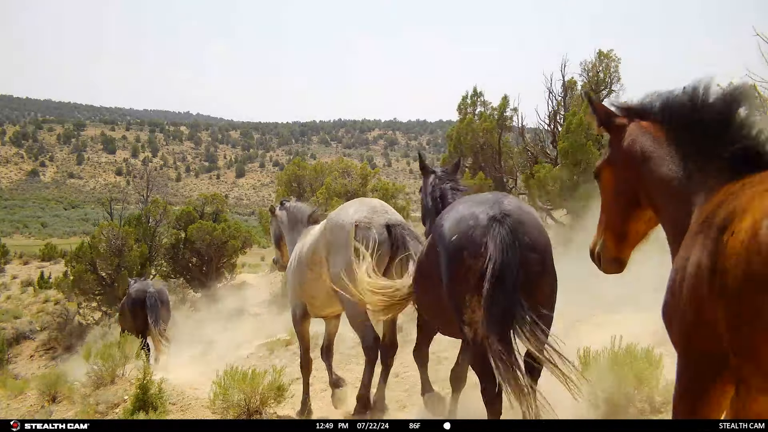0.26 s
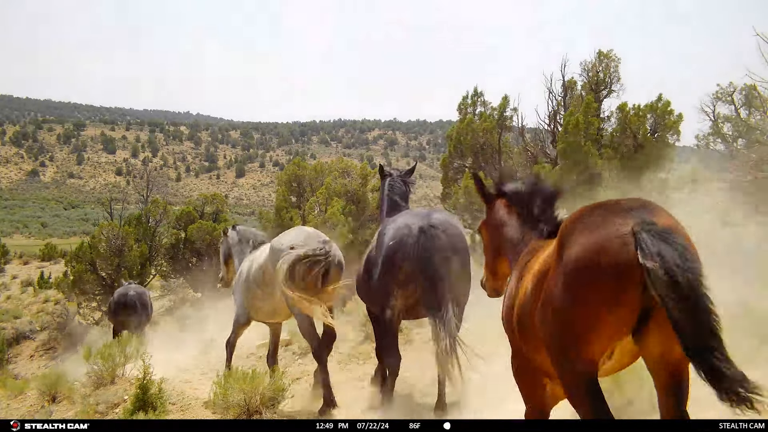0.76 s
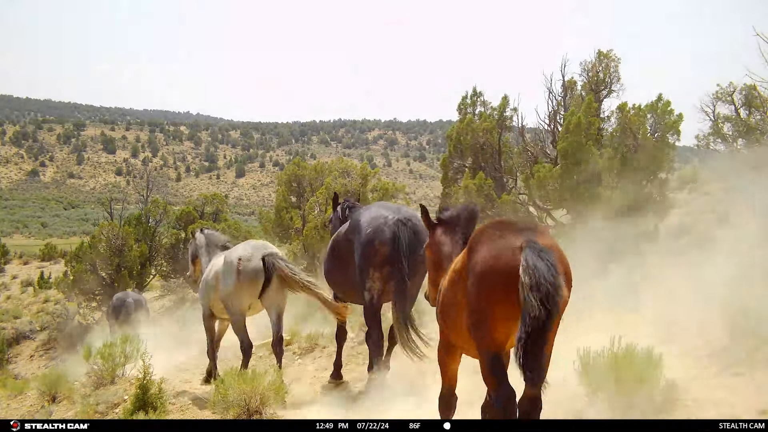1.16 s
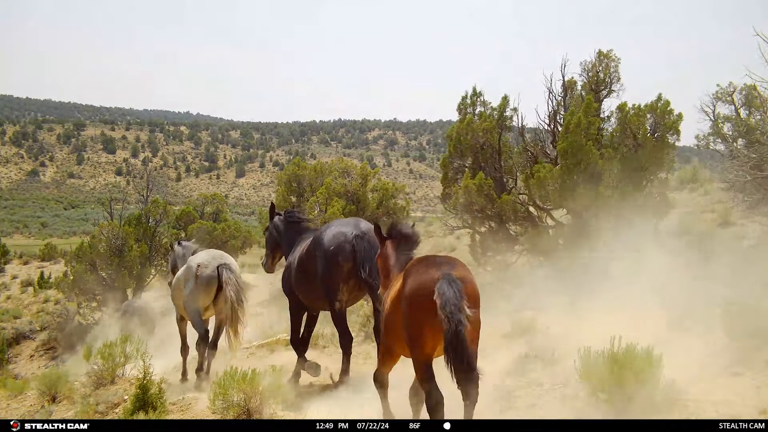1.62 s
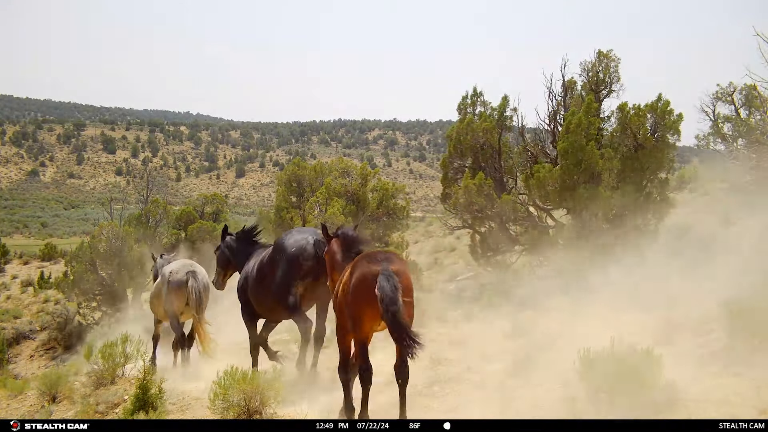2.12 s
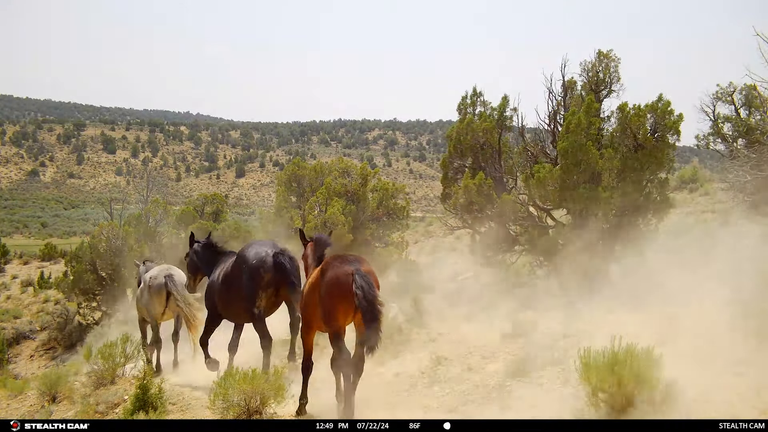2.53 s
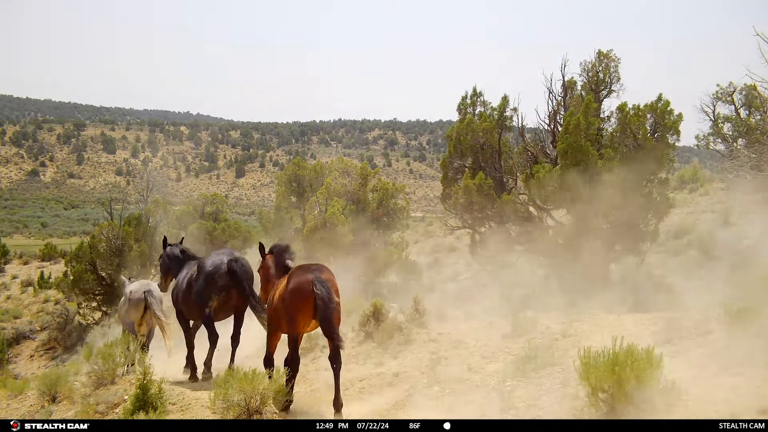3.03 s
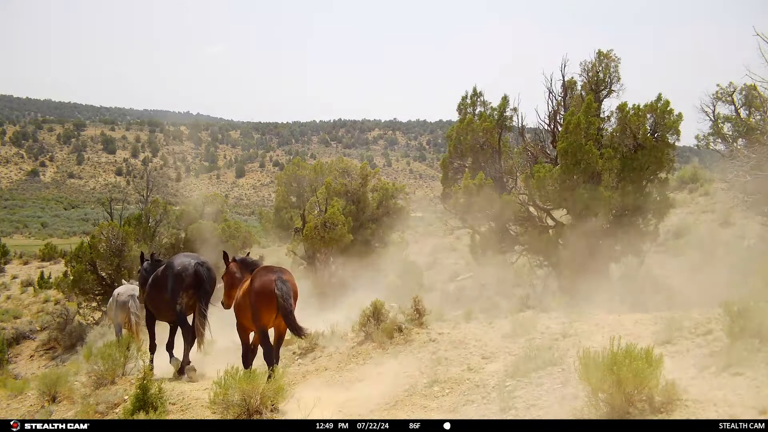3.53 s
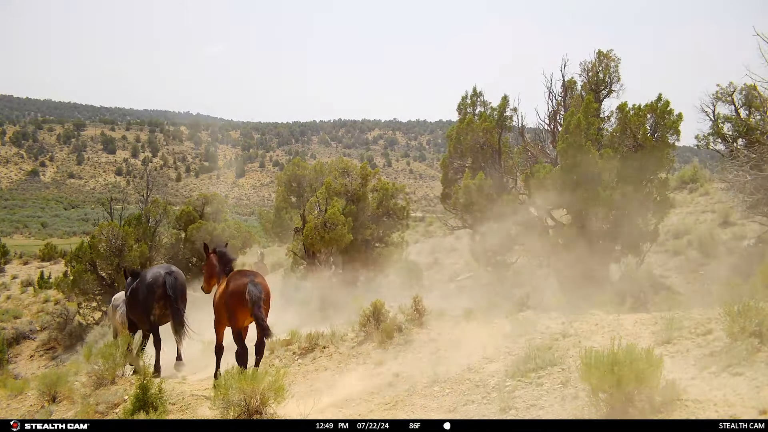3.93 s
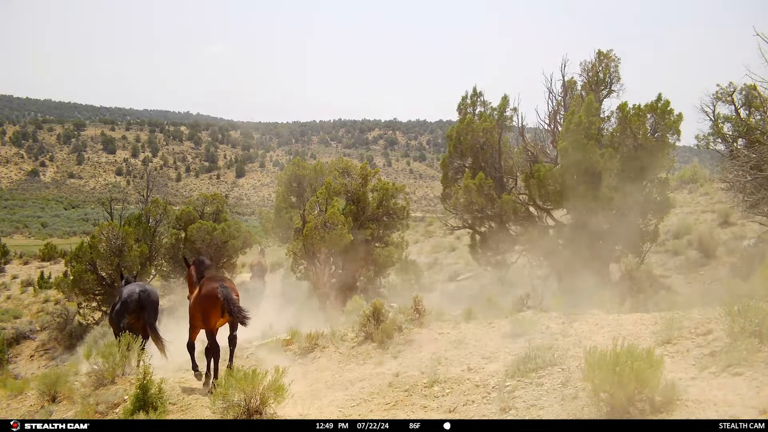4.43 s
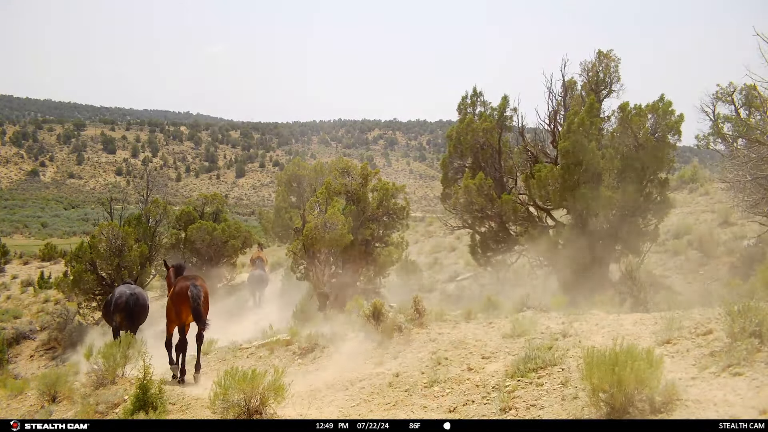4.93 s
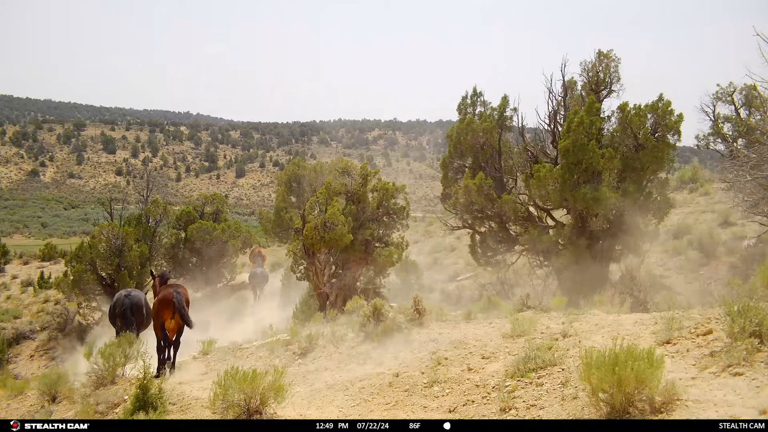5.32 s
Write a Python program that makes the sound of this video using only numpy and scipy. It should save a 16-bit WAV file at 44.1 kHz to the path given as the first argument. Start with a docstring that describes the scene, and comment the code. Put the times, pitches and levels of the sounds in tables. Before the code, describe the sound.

Several horses trot away over dry, stony dirt, heard outdoors through a small microphone. For the first 1.2 seconds, close, dull hoof thuds land unevenly, with bright stone clicks, gritty scuffs and low wind gusts buffeting the microphone. There is a brief lull around 1.5 seconds. From about 1.8 to 4 seconds the hoofbeats continue in an irregular patter with softer clicks and light crunching, including a firm thud at 2.4 seconds and a bright snap at 3.8. The wind rumble swells again from roughly 2.7 to 4.5 seconds, then eases. The sharpest crack, like a twig breaking or a stone being struck, comes at about 4.5 seconds, with another at 4.75. Quick snaps, clicks and sandy scrapes continue until the end at about 5.5 seconds as the thuds grow weaker and sparser. A faint, steady rumble and thin hiss of air run underneath.

```python
"""On dry, stony dirt, horses trot away past a small microphone.
Each hoof impact drives a damped oscillation of the ground; struck stones and dry twigs snap and ring,
and hooves dragging through grit set off a crunch of tiny collisions. Gusts buffet the microphone with
turbulent pressure over a faint background of air, and it overloads on the sharpest crack."""
import sys
import numpy as np
from scipy import signal
from scipy.io import wavfile
from scipy.ndimage import uniform_filter1d

SR = 44100
rng = np.random.default_rng(int(sys.argv[2]) if len(sys.argv) > 2 else 0)


def generate_wav(signal):
    """Clip the signal to [-1, 1] and save it as 16-bit WAV at the path in sys.argv[1]."""
    frames = np.transpose(np.atleast_2d(signal))
    scaled = np.clip(frames, -1, 1) * 32767
    pcm = np.round(scaled).astype(np.int16)
    wavfile.write(sys.argv[1], SR, pcm)


N = 245195

# hooves landing on dirt: t/s, level/dB, f/Hz, T60/s
HOOF_FALLS = [(0.151, -14, 91.5, 0.032), (0.168, -6.5, 88.5, 0.064), (0.241, -19, 122, 0.12),
              (0.469, -27.5, 162, 0.16), (0.573, -7, 149, 0.026), (0.859, -15, 160, 0.072),
              (1.085, -26, 185, 0.11), (1.128, -20, 93, 0.1), (1.187, -25, 274, 0.062),
              (1.839, -29, 145, 0.13), (1.929, -32.5, 196, 0.14), (2.129, -29.5, 173, 0.073),
              (2.278, -19, 136, 0.039), (2.324, -35.5, 194, 0.15), (2.381, -7.5, 168, 0.035),
              (2.647, -22, 202, 0.065), (2.725, -28, 159, 0.071), (2.869, -23.5, 145, 0.075),
              (2.934, -26.5, 130, 0.11), (2.995, -18.5, 123, 0.081), (3.105, -13.5, 200, 0.027),
              (3.145, -21, 154, 0.062), (3.241, -17.5, 107, 0.055), (3.295, -19, 123, 0.11),
              (3.346, -15.5, 129, 0.071), (3.477, -26, 91, 0.055), (3.582, -30, 530, 0.062),
              (3.583, -19.5, 138, 0.083), (3.641, -11, 94, 0.087), (3.907, -19.5, 145, 0.076),
              (4.2, -11, 96.9, 0.018), (4.591, -32, 525, 0.035), (4.593, -16.5, 137, 0.065),
              (4.628, -21.5, 173, 0.079), (4.749, -13, 167, 0.05), (4.845, -29.5, 280, 0.078),
              (5.058, -35, 183, 0.085), (5.124, -31, 208, 0.071), (5.343, -20.5, 294, 0.076)]
def hoof_thuds():
    """Damped oscillation: the ground yields to the hoof in a low swing of sinking pitch and a dull puff."""
    out, t = np.zeros(N), np.arange(8000) / SR
    noises = rng.standard_normal((len(HOOF_FALLS), len(t)))
    for (start, db, hz, t60), noise in zip(HOOF_FALLS, noises):
        swing = np.sin(2 * np.pi * hz * t * (1.1 - 2.0 * t))
        puff = 0.82 * unit_rms(split(noise, hz=3.13 * hz)[0])
        attack = 1 - np.exp(-t * hz / 0.85)
        add(out, start, amp(db - 60 * t / t60) * attack * (swing + puff))
    return out


# stones and twigs struck: t/s, level/dB, f/Hz, relative snap level/dB, relative scatter level/dB
STONE_STRIKES = [(0.038, -25.5, 795, 2, -12), (0.114, -20.5, 2530, -7, -17), (0.147, -20, 5500, 1.5, -7),
                 (0.211, -22.5, 2360, -23, -13), (0.304, -33.5, 3000, -4, -25),
                 (0.558, -23, 1230, -10, -6.5), (0.607, -13, 3860, -9, -20.5),
                 (0.761, -28.5, 2070, -5, -10), (0.823, -20, 1760, -14, -27), (0.868, -20.5, 2330, -8, -25),
                 (0.898, -18, 5540, -5, -23), (0.906, -15, 3670, 0, -22), (0.956, -32.5, 800, -2, -3.5),
                 (1.092, -19, 1490, -3.5, -21), (1.211, -30.5, 724, 13.5, -9), (1.222, -19, 5050, -3, -27),
                 (1.248, -27.5, 790, -11, -12), (1.442, -18, 3350, -8, -17.5), (1.959, -31, 4000, 2, -13),
                 (1.995, -25.5, 900, -3.5, -31), (2.022, -27.5, 710, -12, -26),
                 (2.075, -28.5, 580, -23, -30), (2.153, -32, 3100, -10.5, -11),
                 (2.384, -18, 1210, -5.5, -39), (2.48, -24, 3340, -7, -14), (2.594, -29.5, 5340, -5, -13.5),
                 (2.651, -35, 890, -1, -11.5), (2.728, -34.5, 1500, -4, -18), (2.875, -36.5, 900, -7, -20),
                 (2.9, -32.5, 810, -15, -38), (2.958, -35, 3000, -2, -19.5), (3.066, -33, 900, -13, -27),
                 (3.108, -23, 1190, -25, -29), (3.295, -31, 930, -13, -28), (3.304, -24, 790, -19, -38),
                 (3.344, -26.5, 840, -15, -18), (3.545, -28, 980, -8, -28), (3.564, -26.5, 1080, -14, -22),
                 (3.751, -31, 5800, 4, -16), (3.809, -9.5, 6400, -0.5, -19), (3.86, -31, 1180, -16, -33),
                 (3.9, -37.5, 930, 8.5, -2), (3.998, -30, 4900, 2, -8.5), (4.022, -34, 5000, -7.5, -26),
                 (4.198, -32, 5500, -4, -23.5), (4.236, -24.5, 920, 2, -17), (4.401, -17, 6300, -14, -14.5),
                 (4.478, -8.5, 1600, 11, -12.5), (4.572, -23, 1240, -16, -22), (4.637, -26, 800, 1, -12.5),
                 (4.731, -25, 1060, 6.5, -28), (4.75, -10, 980, 7.5, -12.5), (4.788, -22.5, 3360, 0.5, -16),
                 (4.831, -23.5, 4030, 7, -22), (4.853, -14.5, 4300, 6.5, -12.5),
                 (4.905, -17, 6500, -8.5, -19), (4.944, -20, 6040, 8.5, -20), (4.993, -22.5, 950, 10, -5),
                 (5.021, -20, 5540, 7, -24), (5.03, -29, 3530, 4, -19), (5.06, -27.5, 900, 7, -10),
                 (5.116, -25.5, 6050, 9, -14), (5.174, -27, 3650, 8.5, -11.5), (5.197, -19, 5400, -2, -30),
                 (5.347, -14.5, 700, -9, -20.5), (5.391, -28, 3320, -8, -5.5), (5.446, -33, 1150, 1.5, -3),
                 (5.492, -23, 1130, -28, -2.5)]
def stone_knocks(scatter_t60_s=0.083):
    """Impulse response: a stone or twig snaps and rings for a cycle or two, then chips scatter."""
    out, t = np.zeros(N), np.arange(6000) / SR
    noises = rng.standard_normal((len(STONE_STRIKES), len(t)))
    snap_decay = np.exp(-t / 0.001)
    chips = split(gravel(per_s=1200, spread_db=2.0, cycles=2.5, together=0.25), hz=600)[1]
    for (start, db, hz, snap_db, scatter_db), noise in zip(STONE_STRIKES, noises):
        ring = np.sin(2 * np.pi * hz * t) * np.exp(-t * hz / 1.95)
        burst = split(noise, hz=0.85 * hz)[1] * snap_decay
        snap = amp(snap_db) * burst * np.linalg.norm(snap_decay) / np.linalg.norm(burst)
        loose_chips = np.resize(chips[round(start * SR):], len(t))
        scatter = amp(scatter_db - 60 * t / scatter_t60_s) * loose_chips
        add(out, start, amp(db) * (ring + snap + scatter))
    return out


# spectral shaping of the crunch: f/Hz, gain/dB
GRIT_SPECTRUM = [(88, -34.5), (200, -10.5), (500, -13), (1000, -17), (2500, -24), (6000, -29),
                 (11000, -37.5)]
# hooves dragging: peak t/s, level/dB, 20 dB rise/s, 20 dB fall/s, relative sand level/dB
HOOF_DRAGS = [(0.04, -45, .1, 0.34, 1.5), (0.158, -38.5, .09, 0.185, 5.5), (0.271, -35.5, 0.1, 0.07, 3.5),
              (0.485, -40.5, 0.1, 0.19, 0.5), (0.569, -36, 0.06, 0.065, .5), (0.86, -37, 0.16, 0.17, 1.5),
              (0.904, -41, -0.15, 0.08, -8), (0.965, -49, 0.2, 0.02, -1), (1.175, -46.5, 0.16, 0.09, 3.5),
              (1.21, -42, 0.09, .2, 1.5), (1.51, -45.5, 0.1, 0.26, 3.5), (1.62, -50.5, .1, 0.34, 2),
              (1.864, -48.5, 0.06, 0.04, 9), (1.995, -43, 0.12, .11, -0.5), (2.165, -49, -0.05, 0.3, 3),
              (2.393, -40.5, 0.1, 0.1, -8), (2.49, -43.5, -0.05, 0.37, -4.5), (2.6, -50, .02, 0.16, -0.5),
              (2.73, -50.5, 0.3, .3, -6.5), (2.933, -51, .3, 0.6, -4), (3.037, -41.5, 0.09, 0.25, -19),
              (3.2, -47, 0.13, 0.33, 0), (3.304, -34.5, 0.02, 0.04, -3), (3.354, -40, -0.01, .03, -2.5),
              (3.58, -34, 0.04, 0.0554, -3.5), (3.654, -47, 0.2, 0, -2.5), (3.813, -54, 0.5, 0, -10),
              (3.915, -41, 0.05, 0.2, -4), (4.25, -28, 0.02, .03, -5), (4.33, -45.5, 0.26, .1, -2),
              (4.412, -56, -2.3, 2, 5), (4.488, -24.5, -0.0053, 0.03, 4.5), (4.598, -37, 0.13, 0.1, 0),
              (4.7, -46.5, -0.11, -0.26, 13), (4.757, -42, 0.19, -0.37, -2), (4.82, -41.5, .04, -0.06, 9.5),
              (4.9, -48.5, 0.13, 0.5, 12.5), (4.988, -34.5, 0.0333, 0.14, 4.5),
              (5.188, -55.5, -1.4, 0.9, 4.5), (5.354, -39, 0.05, -0.04, 3), (5.406, -44.5, 0.09, 0, 7.5),
              (5.496, -38.5, .07, 0.03, 4)]
def hoof_scuffs():
    """Granular friction: under a dragging hoof coarse grit crunches and fine sand hisses above it."""
    # the bed is the steady shuffle of the farther hooves
    coarse_level, sand_level = swells(HOOF_DRAGS, bed_db=-62, bed_high_db=-3.5)
    crunch = gravel(per_s=380, spread_db=3.3, cycles=3.0, together=0.4)
    coarse, sand = split(colour(crunch, GRIT_SPECTRUM), hz=2430)
    midrange_rms = np.std(split(coarse, hz=373)[1])
    return (coarse_level * coarse + sand_level * sand) / midrange_rms


def gravel(per_s, spread_db, cycles, together):
    """Superposition: grains of seven sizes each sound in their own band; some slip together."""
    shared, out = grains(per_s / 4, spread_db, decay_ms=2.1), np.zeros(N)
    for hz in np.geomspace(300, 8000, 7):
        own = grains(per_s, spread_db, decay_ms=1000 * cycles / hz + 0.5)
        band = signal.butter(1, [hz / 1.35, hz * 1.35], "band", fs=SR)
        out += signal.lfilter(*band, own + together * shared)
    return unit_rms(out)


def grains(per_s, spread_db, decay_ms):
    """Poisson process: collisions at random moments give short noise bursts of very unequal size."""
    sizes = amp(spread_db * np.minimum(rng.exponential(1, N), 4))
    collisions = rng.random(N) < per_s / SR
    decay = np.exp(-np.arange(2000) / SR / (decay_ms / 1000))
    envelope = signal.oaconvolve(sizes * collisions, decay)[:N]
    return unit_rms(envelope * rng.standard_normal(N))


# pressure spectrum of the eddies: f/Hz, spectral level/dB
EDDY_SPECTRUM = [(8.8, -21), (15, 3), (49, -1.5), (139, -17), (280, -32.5), (335, -34.5), (400, -38.5),
                 (520, -72), (880, -120)]
# sustained wind on the microphone: t/s, level/dB
BREEZE_LEVELS = [(0, -28), (0.351, -36.5), (.7, -40), (1, -36.5), (1.2, -38), (1.4, -52), (1.65, -42),
                 (1.83, -53.5), (2.3, -41), (2.49, -51.5), (2.75, -35.5), (3.1, -38.5), (3.5, -36),
                 (4.3, -35.5), (4.6, -55), (4.9, -56), (5.56, -46)]
# gusts: peak t/s, level/dB, 20 dB rise/s, 20 dB fall/s, relative level of the quick eddies/dB
GUSTS = [(0, -10.5, .05, -0.01, -5), (.18, -15.5, .08, 0.22, -9), (.26, -15.5, 0.36, 0.0762, 15),
         (.355, -9, 0.15, .016, -3), (.46, -20.5, 0, 0.33, 0), (.56, -22, .065, .16, 3.5),
         (.785, -16.5, 0.1, 0.2, -11), (1.05, -28, 0.2, .1, -1), (1.15, -28.5, 0.3, 0.25, -4),
         (1.24, -28, 0.1, 0.15, 9.5), (1.41, -37, -0.2, 0, 12), (1.59, -29.5, .13, 0.22, 8),
         (2.06, -39.5, 0.26, 0.4, 17.5), (2.38, -33.5, -0.15, -0.3, 6.5), (2.6, -36, .1, 0.15, 18.5),
         (2.69, -28.5, .12, -0.6, 2), (2.82, -26, 0.35, 0.5, -1), (2.94, -21.5, 0.2, 0.16, -2.5),
         (3.11, -28.5, 0.3, 0.2, -5), (3.19, -24, -0.15, -0.1, 6), (3.28, -16, .18, 0.03, -8.5),
         (3.44, -27.5, 0.3, 0.4, -14), (3.595, -22.5, 0.09, -0.01, 14.5), (3.67, -29, -0.5, 0.3, -9),
         (3.783, -19.5, -0.1, 0.12, -19), (3.96, -23, .1, 0.04, 11), (4.13, -17.5, 0.13, -0.02, -15.5),
         (4.24, -24, 0.1, 0.14, 8.5), (4.325, -18, 0.09, 0.03, 3), (4.43, -29, 0.6, -0.24, -11.5),
         (4.51, -27.5, -0.13, 0.1, 6), (4.66, -31.5, 0.1, 0.2, 6), (5.02, -36, 0.04, 0.4, 6),
         (5.13, -37, -2, -0.1, -17), (5.39, -46, 0, -0.5, 3)]
def wind_buffet(flutter_db=2, flutter_s=0.04):
    """Turbulent pressure: eddies press on the microphone as hard as the gust; sharp ones reach higher."""
    flutter = unit_rms(smooth(rng.standard_normal(N), round(flutter_s * SR)))
    breeze_db = np.interp(np.arange(N) / SR, *np.transpose(BREEZE_LEVELS)) + flutter_db * flutter
    slow_level, quick_level = swells(GUSTS, bed_db=breeze_db, bed_high_db=-5.5)
    eddies = colour(rng.standard_normal(N), EDDY_SPECTRUM)
    eddies /= np.sqrt(smooth(eddies ** 2, samples=1500))  # even push, so the wind sets the level
    slow, quick = split(eddies, hz=75)
    return slow_level * slow + quick_level * quick


# outdoor background: f/Hz, relative spectral level/dB
AIR_SPECTRUM = [(35, -49), (60, -0.5), (182, 1), (630, -17), (2000, -30), (6000, -30), (11000, -23.5)]
def background_air(level_db=-45):
    """Stationary noise: a faint, steady rumble with a thin hiss."""
    return amp(level_db) * unit_rms(colour(rng.standard_normal(N), AIR_SPECTRUM))


def swells(rows, bed_db, bed_high_db):
    """Incoherent addition: swells and a bed sum in power, giving low-band and high-band amplitudes."""
    t, power = np.arange(0, N + 64, 64) / SR, 0
    for peak_s, db, rise_s, fall_s, high_db in rows:
        before = (peak_s - t) / max(rise_s, 0.005)
        after = (t - peak_s) / max(fall_s, 0.005)
        envelope = amp(db - 20 * np.maximum(before, after))
        power = power + np.outer(amp([0, high_db]), envelope) ** 2
    return [np.sqrt(np.interp(np.arange(N) / SR, t, band_power) + amp(bed_db + offset_db) ** 2)
            for band_power, offset_db in zip(power, (0, bed_high_db))]


def colour(x, spectrum):
    """Minimum-phase filtering: a causal response with the given spectrum."""
    gain_db = np.maximum(level_at(spectrum, abs(np.fft.fftfreq(16384, 1 / SR))), -100)
    log_response = np.conj(signal.hilbert(np.log(amp(gain_db))))
    taps = np.fft.ifft(np.exp(log_response)).real[:8192]
    return signal.oaconvolve(x, taps)[:len(x)]


def level_at(spectrum, hz):
    """Interpolation of level over log frequency."""
    f, db = np.transpose(spectrum)
    return np.interp(np.log(hz + 1), np.log(f + 1), db)


def split(x, hz):
    """Complementary filtering: the parts of x under and over hz."""
    low = signal.filtfilt(*signal.butter(2, hz, fs=SR), x)
    return low, x - low


def smooth(x, samples):
    return uniform_filter1d(uniform_filter1d(x, samples), samples)


def amp(db):
    return 10 ** (np.asarray(db) / 20)


def unit_rms(x):
    return x / np.sqrt(np.mean(x ** 2) + 1e-20)


def add(mix, start_s, sound):
    part = mix[round(start_s * SR):][:len(sound)]
    part += sound[:len(part)]


def scene():
    """Linear superposition: all sources add at one point, the same in both channels."""
    air = background_air()
    return np.tile(stone_knocks() + hoof_thuds() + hoof_scuffs() + wind_buffet() + air, (2, 1))


# frequency response of the sound, with a dip near 4.5 kHz and the treble falling away above 7 kHz: f/Hz,
# gain/dB
TONE_RESPONSE = [(20, -5.5), (3900, 1.5), (4500, -2), (5200, 0), (5900, 1.5), (6900, -7.5), (8200, -15.5),
                 (9600, -27), (11000, -40.5), (13000, -77.5)]
# treble fuzz that differs left and right: f/Hz, side-to-mid gain/dB
FUZZ_SPECTRUM = [(100, -78), (500, -44.5), (1500, -23), (3000, -15), (6000, -10.5), (10000, -1.5)]
def record(dry, overload=0.9, cutoff_hz=16000):
    """Saturation: the sound is coloured, its treble dulled above 7 kHz, then clipped; faint stereo fuzz and a
    band limit follow."""
    mid = np.clip(colour(dry[0], TONE_RESPONSE), -overload, overload)
    hz, _, spectra = signal.stft(mid, SR, nperseg=512)
    fuzz = uniform_filter1d(abs(spectra), 5, axis=0) * amp(level_at(FUZZ_SPECTRUM, hz))[:, None]
    random_phase = np.exp(2j * np.pi * rng.random(spectra.T.shape).T)
    side = signal.istft(fuzz * random_phase, SR, nperseg=512)[1][:N]
    stereo = np.array([mid + side, mid - side])
    lowpass = signal.firwin(511, cutoff_hz, window=("kaiser", 9), fs=SR)
    return signal.oaconvolve(stereo, lowpass[None], "same")


dry = scene()
out = record(dry)
generate_wav(out)
```